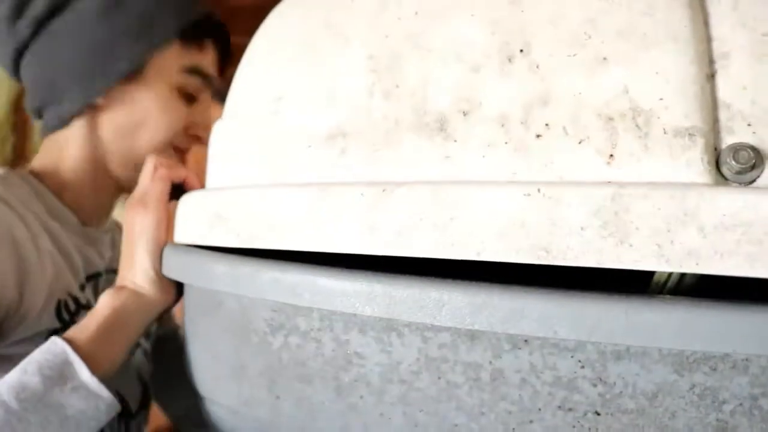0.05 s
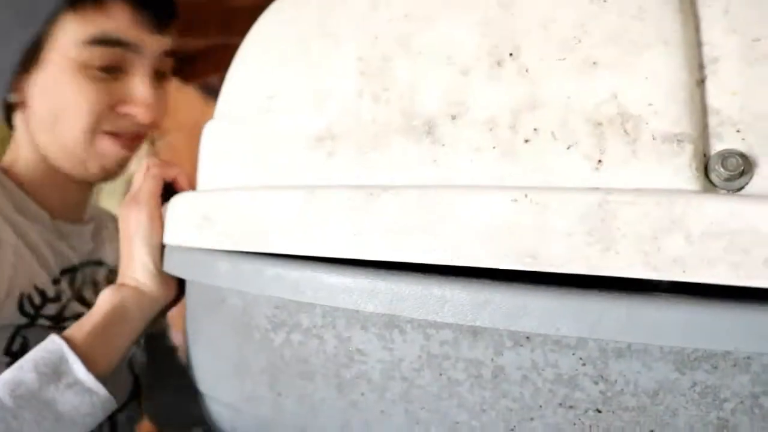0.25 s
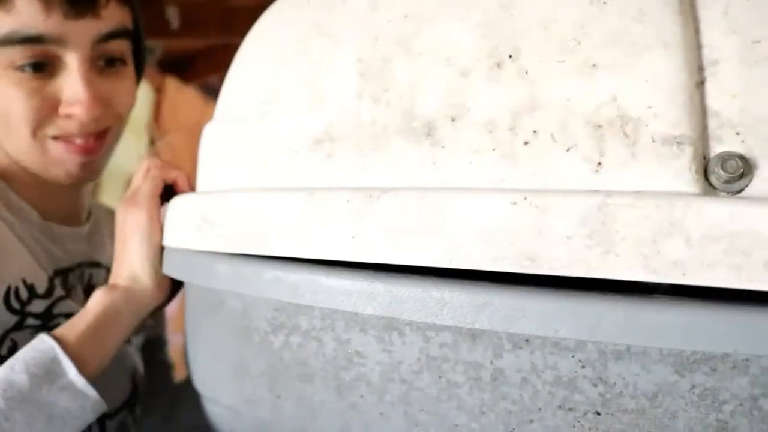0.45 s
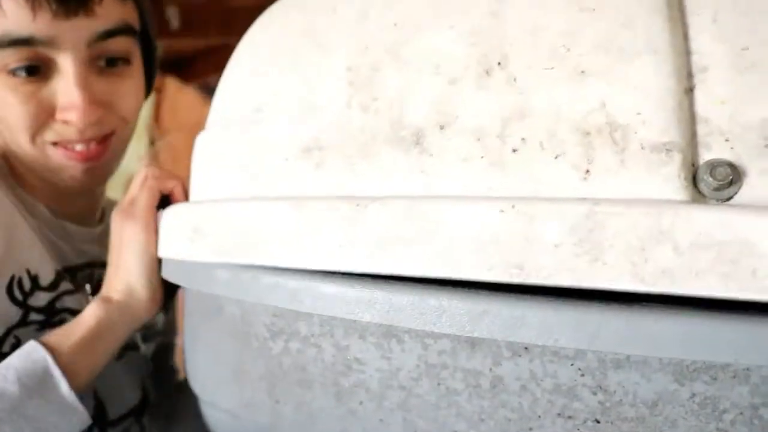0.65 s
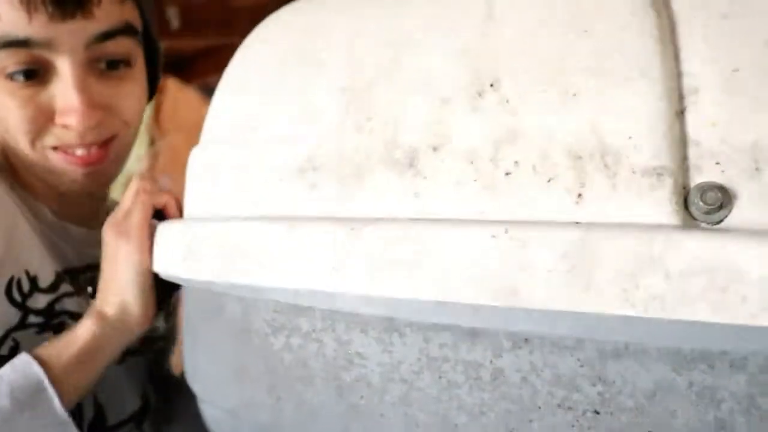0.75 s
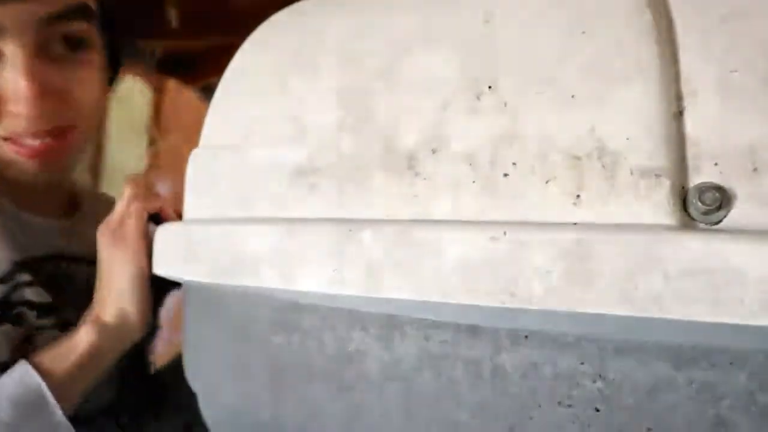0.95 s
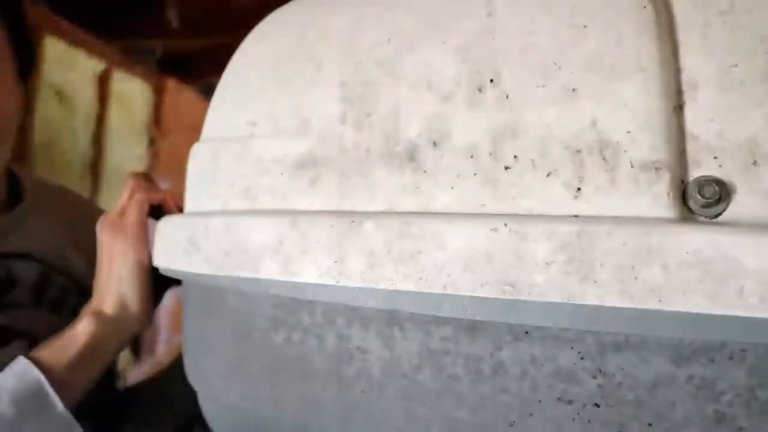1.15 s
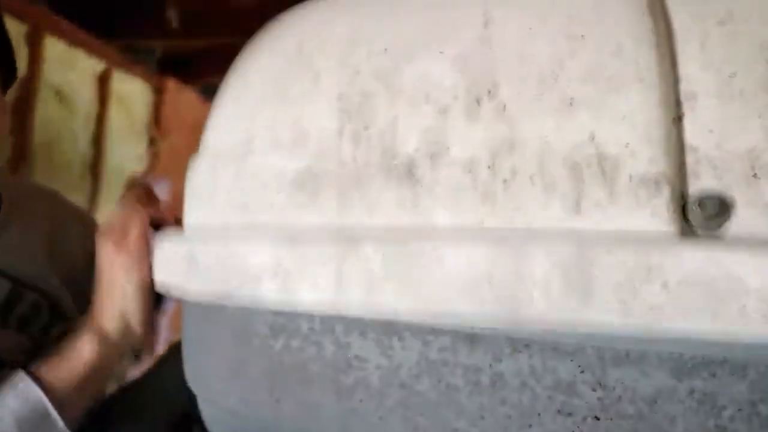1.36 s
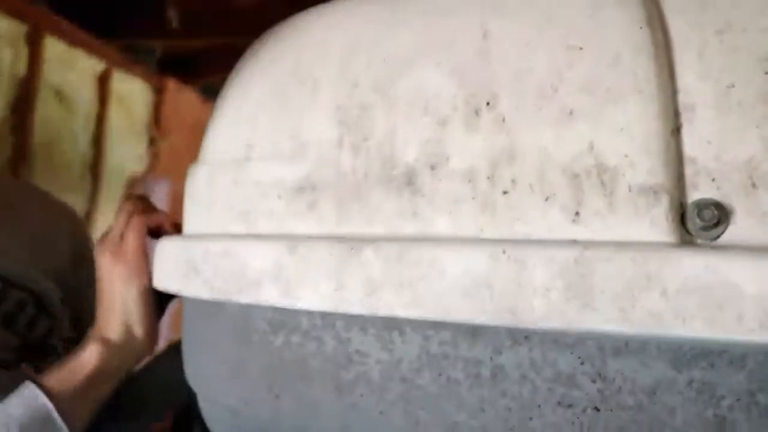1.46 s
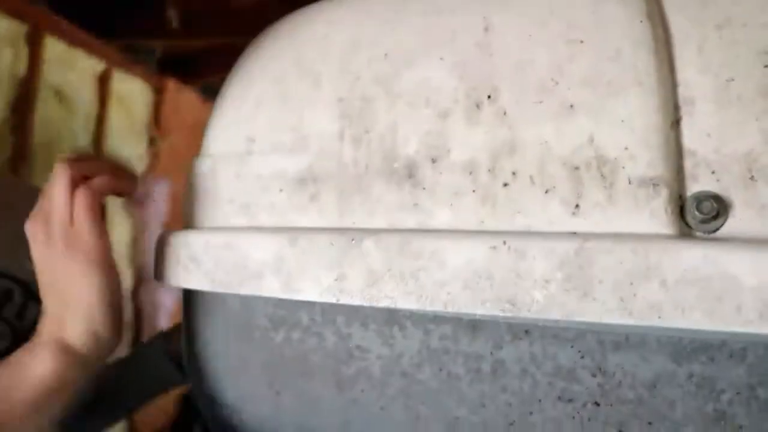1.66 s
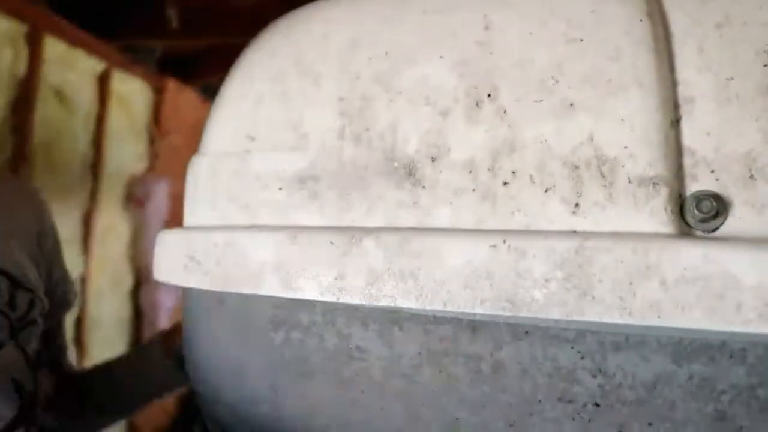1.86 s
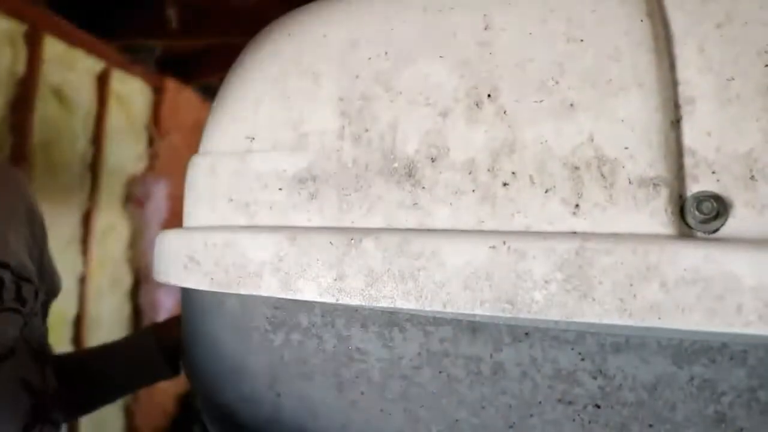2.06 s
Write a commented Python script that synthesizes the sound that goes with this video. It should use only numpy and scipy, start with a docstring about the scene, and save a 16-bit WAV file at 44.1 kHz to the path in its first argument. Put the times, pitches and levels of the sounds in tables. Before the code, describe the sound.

A plastic cargo box lid is pressed shut, close to the microphone in a garage. The rim scrapes and knocks softly, the lid cracks into its seat, then the latch snaps loudly with a hollow thump and brief echo.

```python
"""A rooftop cargo box in a garage, the microphone close to its plastic lid as it is pressed shut.
Over still air the shell rumbles under the hands; the rim knocks and scrapes on the base, the hollow
shell thumps and the rim squeaks once. At 0.8 s the lid cracks into its seat and the latch ticks.
One more scrape, then the latch snaps at 1.47 s and the hand slides off. A limiter ducks the loudest
blows and lets the ring of the garage swell back."""
import sys
import numpy as np
from scipy import signal
from scipy.fft import rfft, irfft
from scipy.io import wavfile
from scipy.ndimage import uniform_filter1d, minimum_filter1d

SR = 44100
rng = np.random.default_rng(int(sys.argv[2]) if len(sys.argv) > 2 else 0)


def store_pcm(level_fs):
    """Save levels as 16-bit WAV."""
    pcm = np.round(np.clip(level_fs, -1, 1) * 32767).astype(np.int16)
    wavfile.write(sys.argv[1], SR, np.atleast_2d(pcm).T)


N = 92610
T = np.arange(N) / SR

# still air of the garage: frequency_hz, gain_db
AIR_SPECTRUM = [(20, -17.5), (42, 5), (61, 17), (80, 4), (160, -2), (400, -1.5), (1000, -7), (2500, -16),
                (6000, -20), (15000, -22)]
# the shell rumbling under the hands: time_s, level_db
FLEX_LEVELS = [(0, -58), (.14, -61.5), (.2, -35.5), (.27, -34.5), (.36, -49), (.45, -40.5), (.62, -48),
               (.73, -42), (.78, -38.5), (.94, -36.5), (1.06, -52.5), (1.14, -47), (1.3, -56.5),
               (1.42, -47.5), (1.55, -18.5), (1.67, -34.5), (1.78, -43), (1.95, -60.5), (2.1, -61)]
# tone of that rumble: frequency_hz, gain_db
FLEX_SPECTRUM = [(20, 4.5), (60, -16), (110, 4), (165, 6.5), (260, 0), (450, -9), (1200, -14),
                 (3000, -28.5), (8000, -48)]
# the rim knocking on the base: start_s, level_db, treble_edge_hz
RIM_KNOCKS = [(.113, -44.5, 3500), (.237, -31, 1667), (0.316, -42.5, 3000), (0.358, -39, 3800),
              (.484, -29, 3500), (0.564, -30, 5708), (.577, -32, 1701), (0.8165, -22.5, 4000),
              (.829, -27, 4500), (0.849, -26.5, 4737), (0.896, -37.5, 4000), (0.983, -42.5, 7000),
              (1.114, -46.5, 3500), (1.187, -36, 4540), (1.475, 1, 5500)]
# tone of a knock: frequency_hz, gain_db
KNOCK_SPECTRUM = [(60, -13), (200, 3), (450, 1), (800, -4.5), (1250, -1), (2200, -6.5), (3400, -6),
                  (4800, -11.5), (7000, -5.5), (15000, -24.5)]
# decay of a knock: frequency_hz, t60_s
KNOCK_DECAY = [(150, 0.11706), (600, 0.23603), (1500, 0.0628), (3500, 0.02535), (7000, 0.008794),
               (15000, .03)]
# tone of the reflections from box and rafters: frequency_hz, gain_db
EARLY_SPECTRUM = [(50, -12.5), (250, 5.5), (4000, 1.5), (8000, 4)]
# decay of the garage's ring: frequency_hz, t60_s
ROOM_DECAY = [(100, 0.4541), (300, 0.4468), (1000, 0.4727), (3000, 0.4036), (5500, 0.286), (8000, 0.0003),
              (15000, 0.2105)]
# tone of that ring: frequency_hz, gain_db
ROOM_SPECTRUM = [(40, -15), (150, -13), (400, -10.5), (1000, -14), (2500, -11.5), (5000, -16.5),
                 (7500, -12.5), (15000, -17)]
# the rim scraping over the base: start_s, rise_s, hold_s, fall_s, force_db
RIM_SCRAPES = [(0.183, .055, 0.016912, 0.004667, -33.5), (0.35, 0.0024, 0.00848, 0.00934, -43.5),
               (0.466, 0.015466, 0.05648, 0.01453, -32.5), (0.565, 0.004775, 0.003617, 0.008587, -30),
               (0.65, 0.02593, 0.03259, 0.02088, -46.5), (0.756, 0.03246, 0.0415, 0.02157, -34),
               (0.884, .008, 0.0082, 0.016, -43), (1.108, .006, 0.0062, .025, -46),
               (1.167, 0.049747, 0.025969, 0.028318, -29.5)]
# tone of a scrape: frequency_hz, gain_db
SCRAPE_SPECTRUM = [(50, -52), (150, 7), (330, 8.5), (700, 0.5), (1300, -4.5), (1750, -10), (2300, -16),
                   (3500, -19.5), (5500, -27.5), (8000, -39), (15000, -42)]
# panel resonances under a scrape: pitch_hz, width_hz, relative_db
PANEL_MODES = [(362.1, 28.37, -2), (474.97, 31.7, 4.5), (609.04, 28, -2.5), (660.69, 18, -0.5),
               (768.74, 47.03, 1.5), (917.72, 90, 0), (1030.9, 45.3, 2.5), (1183.6, 49, 3.5),
               (1249.6, 57, -4.5), (2298.6, 160, 4.5)]
# the shell buckling: centre_s, level_db, half_width_ms, box_drive_db
SHELL_BUCKLES = [(0.2527, -21.5, 1.1522, -9), (0.3192, -23.5, 1.3339, -2), (0.6844, -24.5, 1.2245, 0.5),
                 (.796, -13.5, 0.9721, 3), (0.8159, -27, 1.2, -4.5), (0.8279, -11, 0.8525, 14),
                 (0.8415, -14, 0.9134, 2), (0.852, -23.5, 0.7144, -6), (0.9288, -26.5, 1.2867, 6.5),
                 (1.4618, -18, 1.038, 1), (1.4786, 4.5, 0.7904, -4), (1.67, -27.5, 1.5694, -7.5)]
# resonances of the hollow box: pitch_hz, relative_db, t60_s
HOLLOW_MODES = [(106.77, -26.5, 0.19), (139.91, -26, 0.34), (172.48, -21.5, .35), (210.83, -25.5, 0.32),
                (257.74, -14, 0.1779), (322.26, -25.5, 0.089), (370.17, -19, 0.1664), (478, -29.5, .13)]
# tone of the lid cracking into its seat: frequency_hz, gain_db
SEAT_SPECTRUM = [(60, -15), (220, 0), (450, 6), (800, 2), (1350, 3.5), (1800, -4), (2250, 5), (2900, -5.5),
                 (3500, 2), (4500, -4), (5500, -17), (7000, -26.5), (8000, -36), (15000, -43.5)]
# decay of that crack: frequency_hz, t60_s
SEAT_DECAY = [(200, 0.18), (700, 0.09567), (1500, 0.0445), (3000, 0.03519), (4500, 0.01569),
              (7000, 0.01404)]
# the latch clicking: start_s, level_db, bass_edge_hz, treble_edge_hz
LATCH_CLICKS = [(0.8287, -52, 8360, 13000), (0.847, -38, 2705, 8987), (0.9595, -67.5, 5430, 8980),
                (1.4747, -2, 1528, 13560)]
# resonances of the latch: pitch_hz, width_hz, relative_db
LATCH_MODES = [(2038.8, 140, 10), (2965.8, 738, 6), (3880.9, 76.67, 7.5), (4732.2, 406.8, 3),
               (5700, 400, -4.5), (7631.5, 300, -14.5), (9020, 200, -13), (10617, 670, -37.5),
               (13900, 710, -31)]
# tone of the hand sliding off: frequency_hz, gain_db
SLIDE_SPECTRUM = [(30, -1), (60, -5), (160, 5), (450, 1.5), (800, 2), (1200, 6), (1900, -2), (3300, -2.5),
                  (4100, -8.5), (4750, -10), (6000, -16), (7500, -29.5), (15000, -56)]


def amp(db):
    """Decibels to gain."""
    return 10 ** (np.asarray(db) / 20)


def unit_rms(x):
    """Scales to an rms of 1."""
    return x / np.sqrt(np.mean(x ** 2) + 1e-20)


def curve_at(points, hz):
    """Reads a table on a log-frequency axis."""
    frequencies, values = np.transpose(points)
    return np.interp(np.log(hz + 1), np.log(frequencies), values)


def add(mix, start_s, sound):
    """Mixes a sound in at start_s."""
    part = mix[max(round(start_s * SR), 0):][:len(sound)]
    part += sound[:len(part)]


def noise(size):
    """Flat noise of rms 1."""
    phases = np.exp(2j * np.pi * rng.random(size // 2 + 1))
    return unit_rms(irfft(phases, size))


def colour(x, spectrum):
    """Minimum-phase filter that follows a table of frequency_hz, gain_db."""
    hz = abs(np.fft.fftfreq(8192, 1 / SR))
    log_gain = np.log(amp(curve_at(spectrum, hz)))
    taps = np.fft.ifft(np.exp(np.conj(signal.hilbert(log_gain)))).real
    return signal.fftconvolve(x, taps[:len(hz) // 2])[:len(x)]


def coloured_noise(size, spectrum):
    """Noise of rms 1 with the given tone."""
    return unit_rms(colour(noise(size), spectrum))


def butterworth(x, kind, edge_hz):
    """Fourth-order lowpass or highpass."""
    return signal.sosfilt(signal.butter(4, edge_hz, kind, fs=SR, output="sos"), x)


def resonate(x, pitch_hz, width_hz):
    """One resonance of gain 1."""
    radius = np.exp(-np.pi * width_hz / SR)
    pole = radius * np.exp(2j * np.pi * pitch_hz / SR)
    return 2 * signal.lfilter([1 - radius], [1, -pole], x + 1e-18).real


def decay(size, t60_s):
    """An envelope that falls 60 dB in t60_s."""
    return np.exp(-np.log(1000) * T[:size] / t60_s)


def decay_bands(x, decays):
    """Lets each band of x die away at its own speed."""
    hz, spectrum = np.fft.rfftfreq(len(x), 1 / SR), rfft(x)
    centres_hz, t60s = np.transpose(decays)
    out = np.zeros(len(x))
    for share, t60_s in zip(np.eye(len(decays)), t60s):
        band_gain = curve_at(np.c_[centres_hz, share], hz)
        out += irfft(spectrum * band_gain, len(x)) * decay(len(x), t60_s)
    return out


def still_air(level_db=-56.5):
    """Faint, low room tone of the garage."""
    return amp(level_db) * coloured_noise(N, AIR_SPECTRUM)


def shell_flex():
    """Low rumble of the shell flexing under the hands."""
    level_db = np.interp(T, *np.transpose(FLEX_LEVELS))
    return amp(level_db) * coloured_noise(N, FLEX_SPECTRUM)


def rim_knocks():
    """Plastic on plastic: a crowd of short modes, each blow with its own treble edge."""
    out = np.zeros(N)
    for start_s, level_db, treble_edge_hz in RIM_KNOCKS:
        ring = decay_bands(coloured_noise(8192, KNOCK_SPECTRUM), KNOCK_DECAY)
        add(out, start_s, amp(level_db) * butterworth(ring, "lowpass", treble_edge_hz))
    return out


def garage_echoes(x, early_delay_s=.007, late_delay_s=.012):
    """Quick reflections from the box and rafters reach the microphone, then the ring of the room."""
    late = decay_bands(noise(SR), ROOM_DECAY)
    early = noise(SR) * decay(SR, t60_s=.16692)
    response = np.zeros(SR)
    add(response, late_delay_s, colour(late / np.linalg.norm(late), ROOM_SPECTRUM))
    add(response, early_delay_s, amp(-8.5) * colour(early / np.linalg.norm(early), EARLY_SPECTRUM))
    return signal.fftconvolve(x, response)[:N]


def rim_scrapes(slips_per_s=420, slip_spread_db=2.5, grit=.56275):
    """The rim sticks and slips unevenly while it is pushed, and the panels ring."""
    force = np.zeros(N)
    for start_s, rise_s, hold_s, fall_s, force_db in RIM_SCRAPES:
        rise = np.clip((T - start_s) / rise_s, 0, 1) ** 2.3546
        fall = np.exp(-np.maximum(T - start_s - rise_s - hold_s, 0) / fall_s)
        force += amp(force_db) * rise * fall
    speed = np.exp(.66 * unit_rms(uniform_filter1d(noise(N), size=80)))
    slip_count = np.floor(np.cumsum(speed) * slips_per_s / SR)  # slips_per_s holds at a speed of 1
    slips = np.diff(slip_count, prepend=0) * amp(slip_spread_db * np.clip(noise(N), -2, 2))
    friction = unit_rms(slips - slips.mean()) + grit * noise(N)
    rub = force * unit_rms(colour(friction, SCRAPE_SPECTRUM))
    panels = sum(amp(db) * resonate(rub, hz, width_hz) for hz, width_hz, db in PANEL_MODES)
    return amp(-1.5) * (rub + amp(3) * panels)


def shell_thumps():
    """Each buckle pulls and pushes the air once and rings the hollow box."""
    pressure, box_drive = np.zeros(N), np.zeros(N)
    for centre_s, level_db, half_width_ms, box_drive_db in SHELL_BUCKLES:
        offset = (T - centre_s) * 1000 / half_width_ms
        pulse = amp(level_db) * offset * np.exp((1 - offset ** 2) / 2)
        pressure += pulse
        box_drive += amp(box_drive_db) * pulse
    box = sum(amp(db) * np.cos(2 * np.pi * hz * T) * decay(N, t60_s) for hz, db, t60_s in HOLLOW_MODES)
    return pressure + amp(-38) * signal.fftconvolve(box_drive, box)[:N]


def rim_squeak(centre_s=.6897, half_width_s=.002182, pitch_hz=5780, sag_hz_per_s=302000, level_db=-43.5):
    """A tiny falling chirp of plastic on plastic."""
    t = T - centre_s
    envelope = amp(level_db) * np.exp(-(t / half_width_s) ** 2)
    return envelope * np.sin(2 * np.pi * t * (pitch_hz - sag_hz_per_s * t / 2))


def lid_seating(start_s=.7975, rise_s=.002, level_db=-11.5):
    """The lid slips over the rim and cracks down; the treble dies first."""
    out = np.zeros(N)
    crack = decay_bands(coloured_noise(8192, SEAT_SPECTRUM), SEAT_DECAY)
    attack = np.minimum(T[:len(crack)] / rise_s, 1)
    add(out, start_s, amp(level_db) * crack * attack)
    return out


def latch_clicks(smear_s=.0030505):
    """The catch smears each snap over a few milliseconds and rings brightly; light touches are thin."""
    out = np.zeros(N)
    for start_s, level_db, bass_edge_hz, treble_edge_hz in LATCH_CLICKS:
        wander = unit_rms(uniform_filter1d(noise(2048), size=50))
        lag_s = smear_s * np.clip(.5 + .22003 * wander, 0, 1)  # one delay for each frequency
        phase = -np.pi * np.cumsum(lag_s) * SR / len(lag_s)
        chatter = irfft(np.exp(1j * phase))[:len(lag_s)]
        ring = sum((-1) ** k * amp(db) * resonate(chatter, hz, width_hz)
                   for k, (hz, width_hz, db) in enumerate(LATCH_MODES))
        ring = butterworth(ring, "highpass", bass_edge_hz)
        ring = butterworth(ring, "lowpass", treble_edge_hz)
        add(out, start_s, amp(level_db) * ring * np.sqrt(smear_s * SR / np.sum(ring ** 2)))
    return out


def hand_slide(start_s=1.49, peak_s=1.6461, fall_s=.07301, level_db=-33):
    """A soft swish as the palm leaves the plastic."""
    rise = np.sqrt(np.clip((T - start_s) / (peak_s - start_s), 0, 1))
    fall = np.exp(-np.maximum(T - peak_s, 0) / fall_s)
    return amp(level_db) * rise * fall * coloured_noise(N, SLIDE_SPECTRUM)


def scene():
    """The lid close to the microphone, over still air; blows and scrapes have their own echoes."""
    parts = [(shell_thumps(), -4), (rim_knocks(), 1), (lid_seating(), -4.5), (latch_clicks(), -2.5),
             (rim_scrapes() + rim_squeak(), -4.5)]
    lid = sum(direct + amp(send_db) * garage_echoes(direct) for direct, send_db in parts)
    return (lid + hand_slide() + shell_flex() + still_air())[None]


def record(dry):
    """The recorder's limiter drops at once, holds and recovers; peaks are rounded, the top is cut."""
    threshold_db, hold_s, recover_db_per_s = -10, .05269, 103.5
    ceiling, treble_edge_hz = .56, 15950
    power_db = 10 * np.log10(abs(uniform_filter1d(dry[0] ** 2, size=176)) + 1e-12)  # over 4 ms
    over_db = np.maximum(power_db - threshold_db, 0)
    hold_samples = int(hold_s * SR)
    held_db = -minimum_filter1d(-over_db, hold_samples, origin=(hold_samples - 1) // 2)
    recovery_db = recover_db_per_s * T
    duck_db = np.maximum.accumulate(held_db + recovery_db) - recovery_db
    ducked = dry * amp(-uniform_filter1d(duck_db, size=44))
    rounded = ducked / (1 + (ducked / ceiling) ** 8) ** (1 / 8)
    lowpass = signal.firwin(511, treble_edge_hz, window=("kaiser", 9), fs=SR)
    return signal.oaconvolve(rounded, lowpass[None], "same")


dry = scene()
out = record(dry)
store_pcm(out)
```